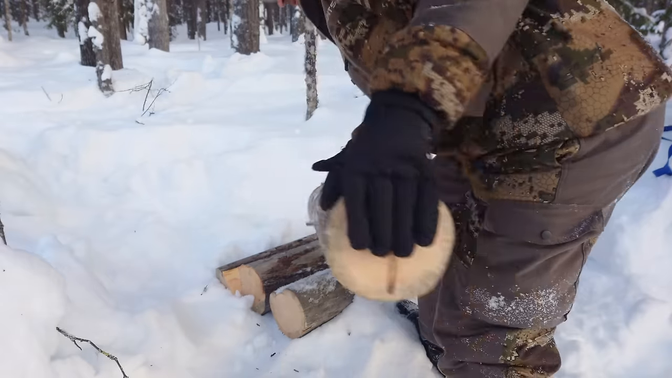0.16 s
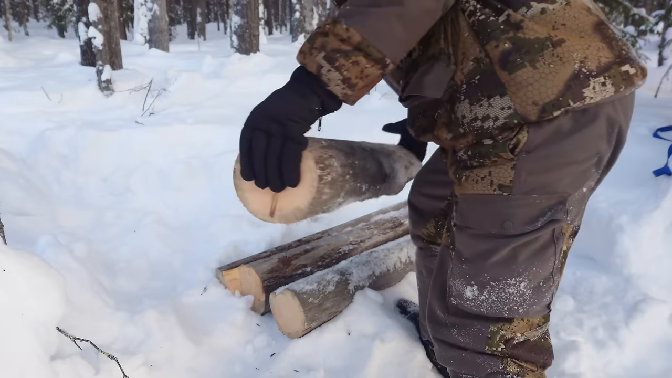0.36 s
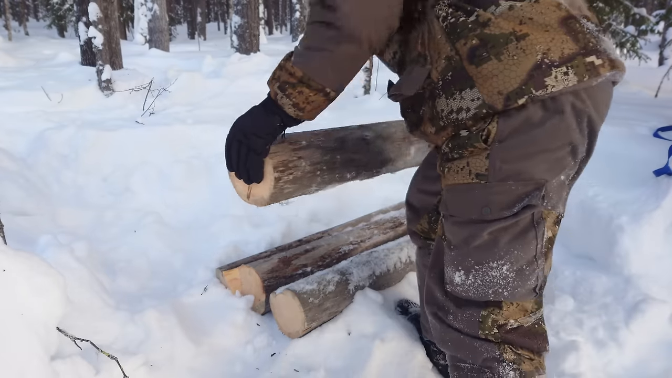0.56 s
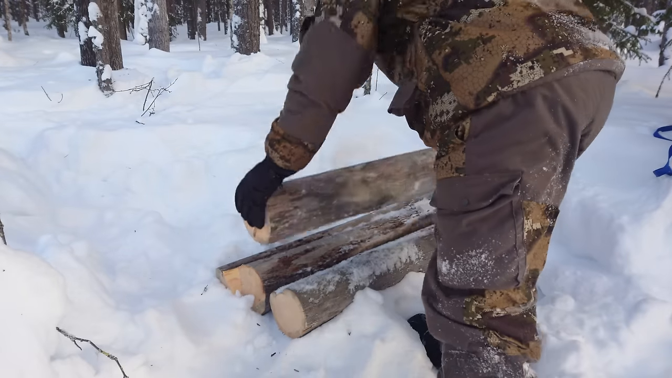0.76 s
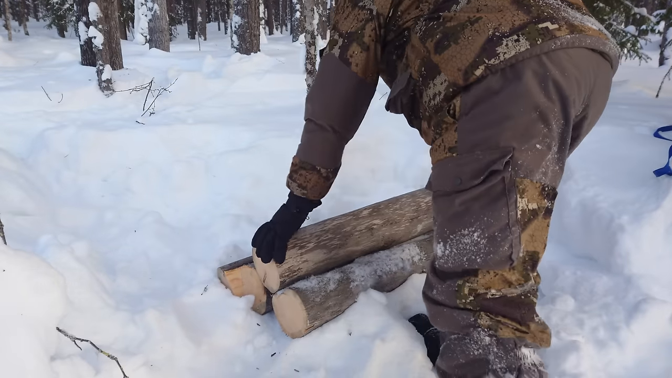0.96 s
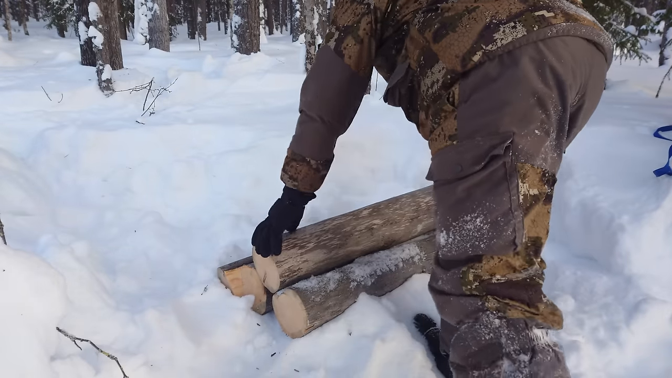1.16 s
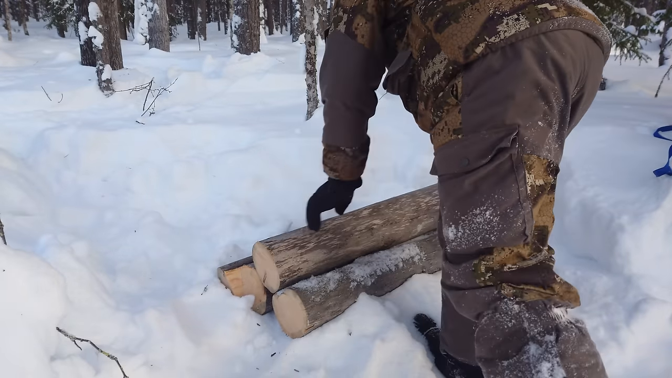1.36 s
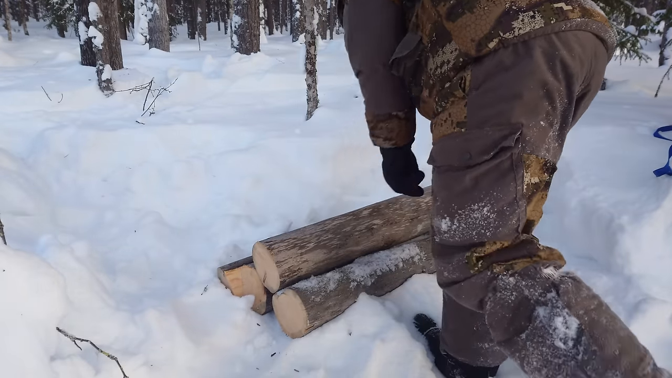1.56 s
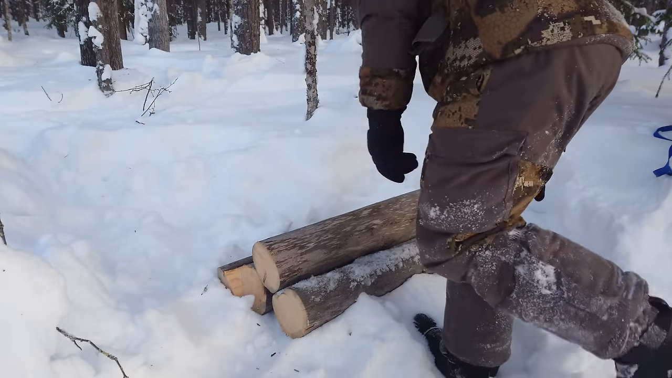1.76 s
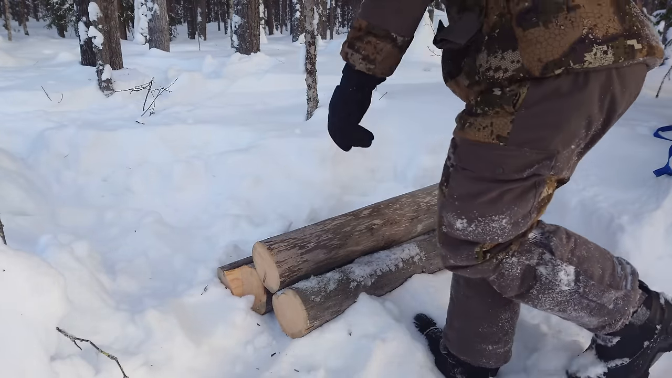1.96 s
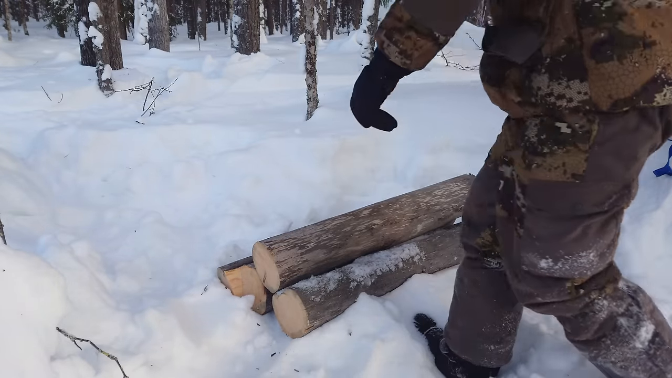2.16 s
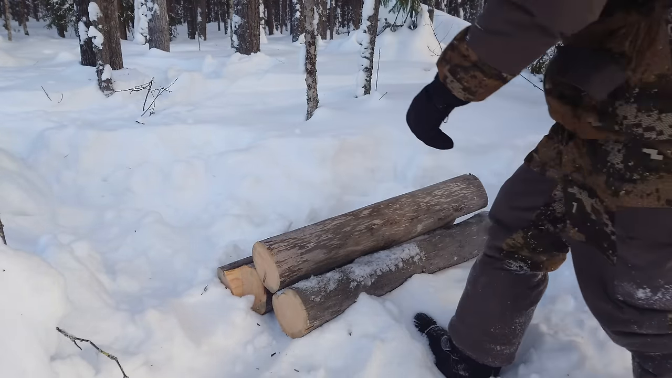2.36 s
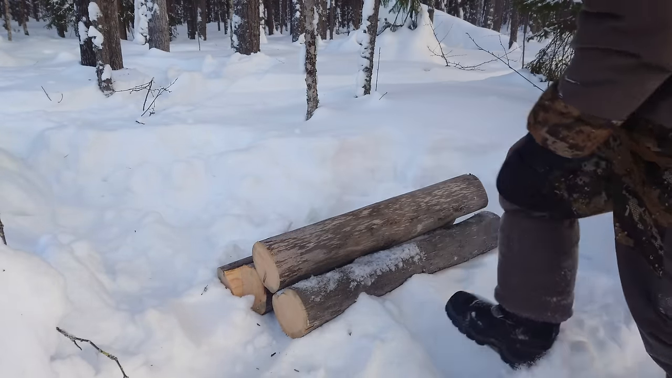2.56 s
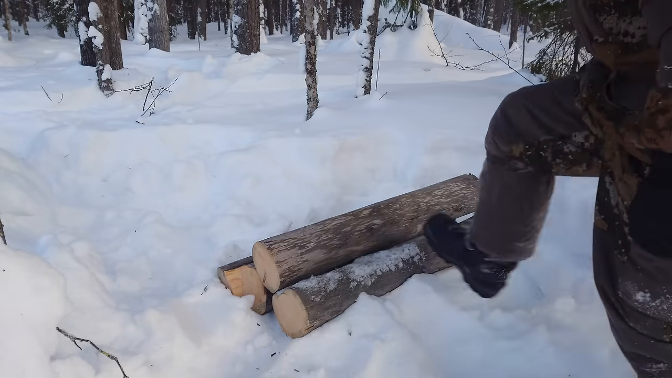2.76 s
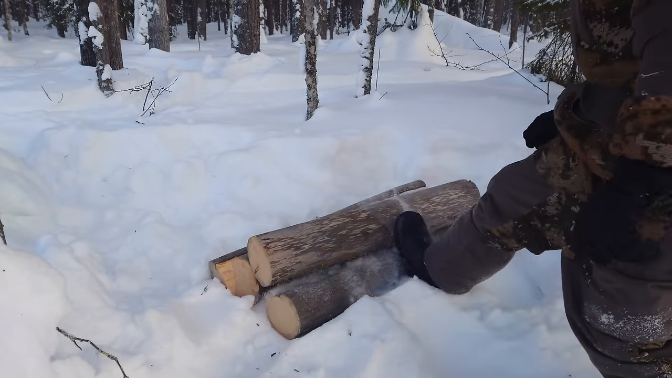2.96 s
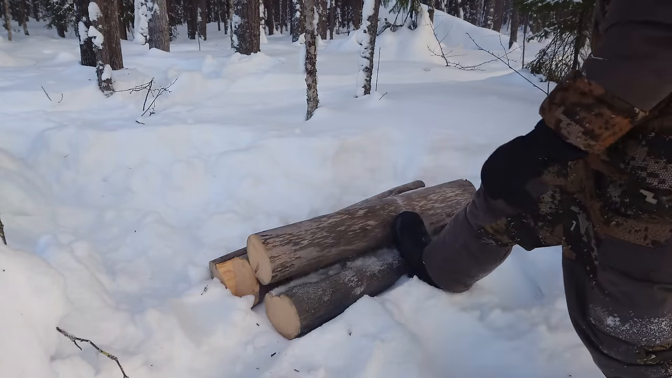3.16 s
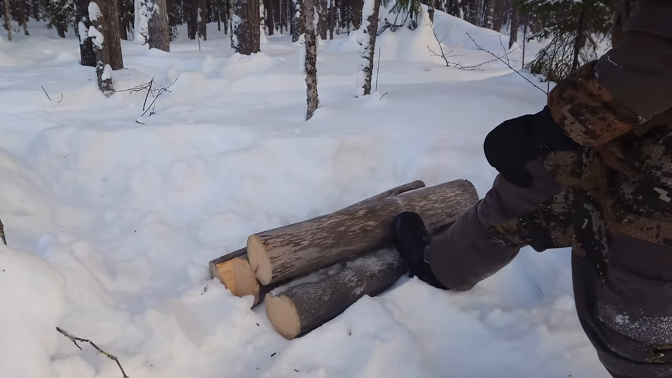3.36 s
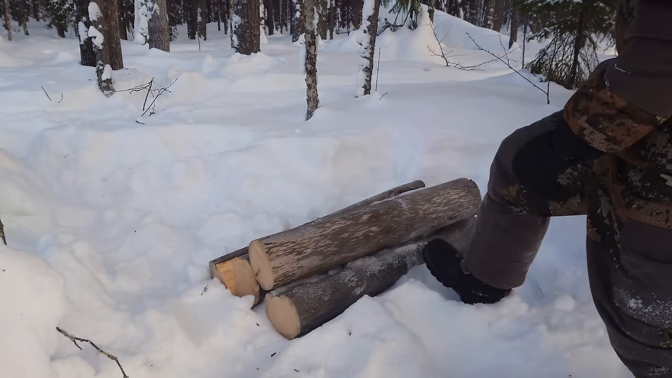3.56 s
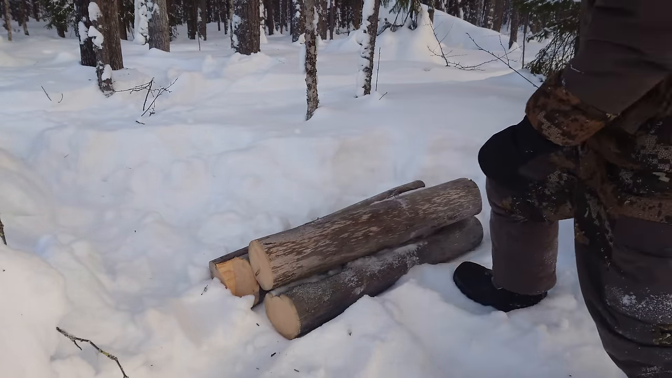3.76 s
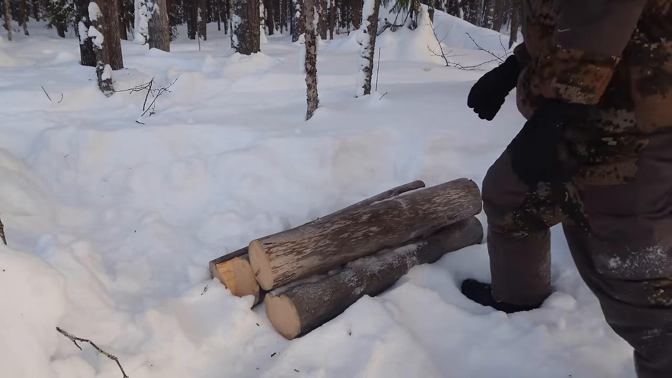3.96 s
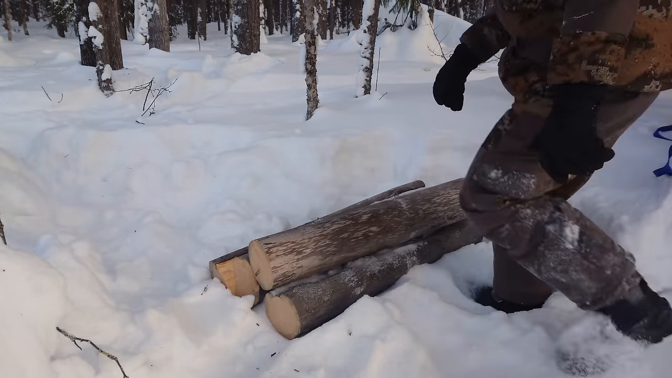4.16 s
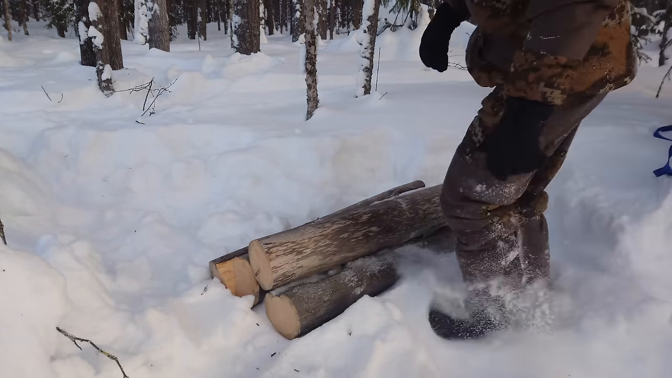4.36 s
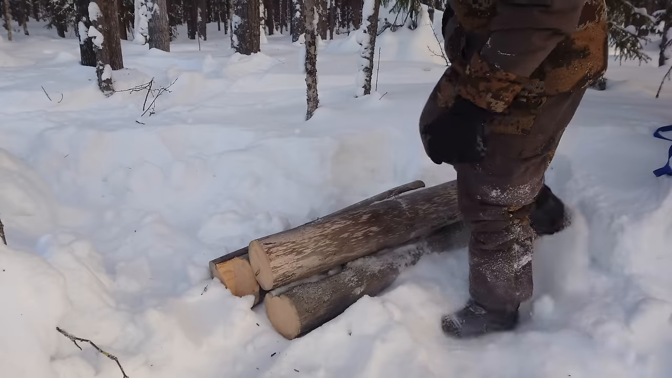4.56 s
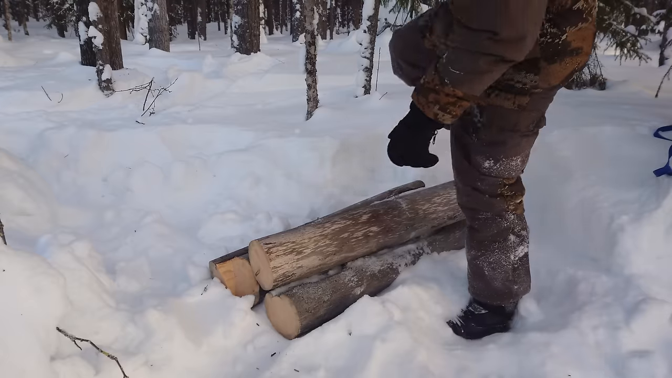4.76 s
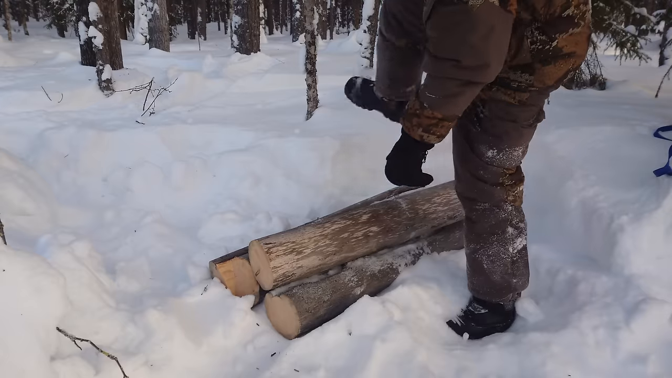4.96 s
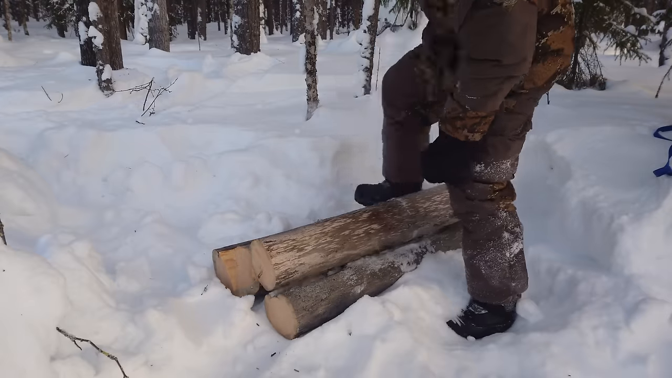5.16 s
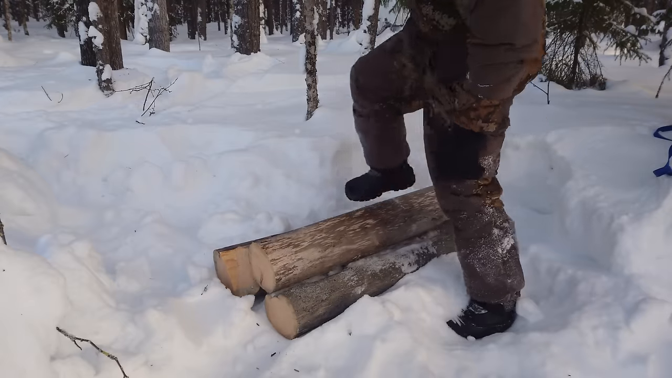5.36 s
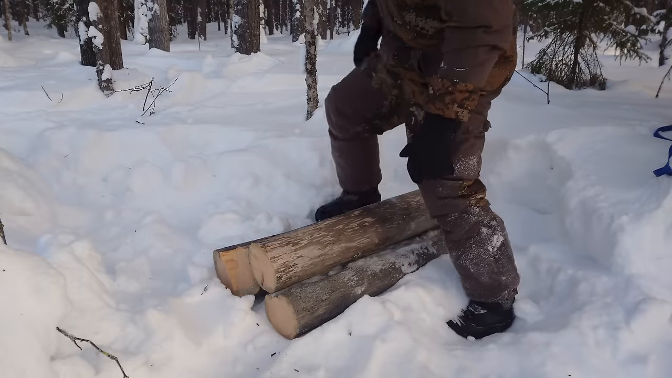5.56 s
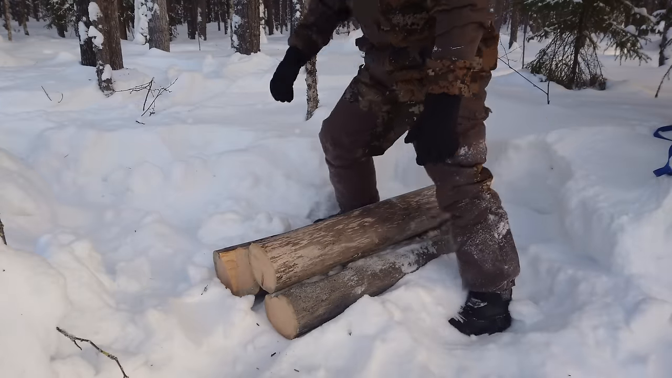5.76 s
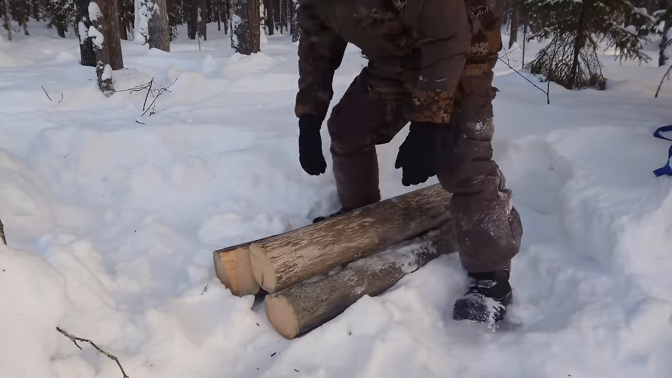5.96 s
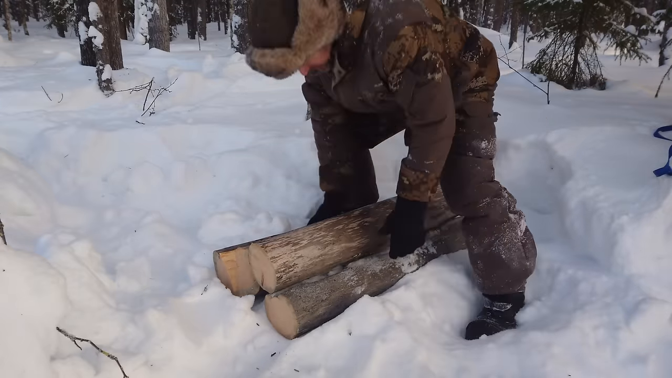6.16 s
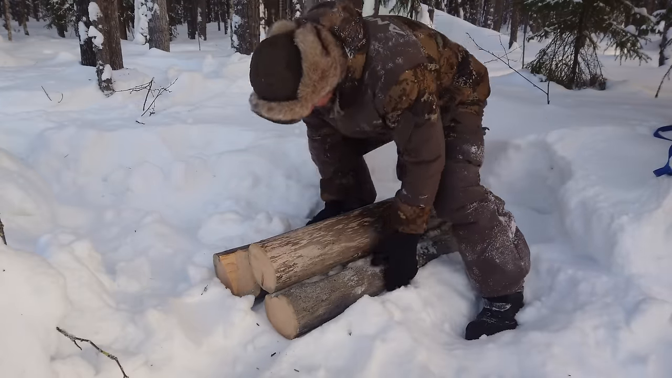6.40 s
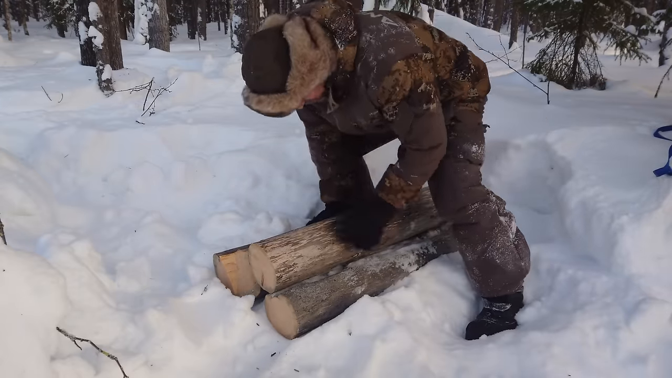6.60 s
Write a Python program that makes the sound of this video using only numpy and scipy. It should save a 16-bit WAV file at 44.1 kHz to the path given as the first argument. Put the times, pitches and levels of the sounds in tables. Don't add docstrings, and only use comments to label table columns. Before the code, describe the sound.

Very close to a small microphone in a quiet snowy wood, snow crumbles and stiff clothes rustle, then a log drops on others with a loud, short woody clonk that overloads. After a lull, boots crunch, a kick thuds the logs with a low jolt, and later a foot lands on them with a snappy crack. Small squeaks, scrapes and snow crunches finish it, nearly echo-free.

```python
import sys
import numpy as np
from scipy import signal
from scipy.io import wavfile
from scipy.ndimage import uniform_filter1d

SR = 44100
rng = np.random.default_rng(int(sys.argv[2]) if len(sys.argv) > 2 else 0)


def decibels_to_gain(level_db):
    exponent = np.asarray(level_db, float) / 20
    return 10 ** exponent


def log_audio(samples):
    frames = np.atleast_2d(samples).T
    limited = np.clip(frames, -1, 1)
    pcm = np.round(limited * 32767).astype(np.int16)
    wavfile.write(sys.argv[1], SR, pcm)


N = 292383

# mode_hz, level_db, t60_s, sign
UPPER_LOG_MODES = [(202, -4.7, .058, 1), (453, -22.4, .185, -1), (498, .1, .089, 1), (508, -8.7, .093, 1),
                   (528, -4.4, .171, 1), (557, -17.2, .165, -1), (732, 3.5, .015, 1),
                   (1012, -16.7, .051, -1), (1169, -16.5, .14, 1)]


def band(x, lo_hz, hi_hz):
    sos = signal.butter(2, [lo_hz, min(hi_hz, .45 * SR)], "band", fs=SR, output="sos")
    return signal.sosfilt(sos, x)


def unit(x):
    return x / np.sqrt(np.mean(x ** 2))


def add(out, start_s, piece):
    i = int(start_s * SR)
    out[i:i + len(piece)] += piece[:N - i]


def walk(rate_hz):
    k = int(SR / rate_hz)
    held = np.repeat(rng.standard_normal(N // k + 1), k)
    return 2.9 * uniform_filter1d(uniform_filter1d(held, k), k)[:N]


def gestures(rows, still_db, attack_s, release_s):
    t, power = np.arange(N) / SR, decibels_to_gain(still_db) ** 2
    for start_s, length_s, level_db in rows:
        swell_s = attack_s + 0.2 * length_s
        rise = np.clip((t - start_s) / swell_s + .5, 0, 1) ** 2
        fall = np.exp(-np.clip(t - start_s - length_s, 0, 1) / release_s)
        power = power + (decibels_to_gain(level_db) * rise * fall) ** 2
    return 10 * np.log10(power)


def first_layer(rows):
    return [(start_s, length_s, level_db) for start_s, length_s, level_db, _ in rows]


def second_layer(rows):
    return [(start_s, length_s, level_db + over_db) for start_s, length_s, level_db, over_db in rows]


def grains(spread_db):
    size_db = spread_db * rng.exponential(size=N).clip(0, 6)
    return unit(rng.standard_normal(N) * decibels_to_gain(size_db))


def crushed(spectrum, common, spread_db, shared, flicker_db, rate_hz):
    hz, db = np.transpose(spectrum)
    together, out = walk(rate_hz), 0
    for f in hz[0] * 2 ** np.arange(.25, np.log2(hz[-1] / hz[0]), .5):
        flicker = together + 0.52 * walk(rate_hz)
        flicker = flicker - uniform_filter1d(flicker, SR // 8)
        breaks = shared * common + grains(spread_db)
        density_db = np.interp(np.log(f), np.log(hz), db)
        gain_db = density_db + 10 * np.log10(f) + flicker_db * flicker
        out = out + decibels_to_gain(gain_db) * unit(band(breaks, f / 2 ** 0.31, f * 2 ** 0.4))
    return unit(out)


def ring(hz, t60_s, t):
    return np.sin(2 * np.pi * hz * t) * np.exp(-np.log(1000) * t / t60_s)


def body(modes, t):
    hz, db, t60_s, sign = np.transpose(modes)[:, :, None]
    return np.sum(sign * decibels_to_gain(db) * ring(hz, t60_s, t), axis=0)


def bursts(table, front, middle):
    out, t = np.zeros(N), np.arange(SR // 10) / SR
    for start_s, peak_db, hz, length_ms in table:
        chips = rng.standard_normal(len(t))
        burst = unit(band(chips, hz / 1.22, hz * 1.16))
        burst = burst + middle * unit(band(chips, 2900, 7500))
        burst = burst + 0.32 * unit(band(chips, 8000, 14000))
        rise = 1 - np.exp(-t * 1000 / (front * length_ms))
        add(out, start_s, decibels_to_gain(peak_db - 8.5) * burst * rise * np.exp(-t * 1000 / length_ms))
    return out


def tremble(lo_hz, hi_hz):
    swing = band(band(rng.standard_normal(N), lo_hz, hi_hz), lo_hz, hi_hz)
    k = int(SR / lo_hz)
    size = np.sqrt(uniform_filter1d(uniform_filter1d(swing ** 2, k), k).clip(1e-12))
    return swing / size * decibels_to_gain(2.26 * walk(14))


def ground():
    # start_s, length_s, sway_db, buzz_over_sway_db
    shakes = [(0, 0.35, -43, -26), (0.24, 0.096, -31.5, -4), (0.41, 0.15, -30, -36),
              (0.567, 0.28, -33.5, -12), (0.949, 0.047, -40.5, 5), (1.065, 0.43, -43.5, -17),
              (1.65, 0.48, -49, -12.5), (2.087, 0.24, -38, -5), (2.327, 0.11, -28, -23),
              (2.446, 0.23, -35, 0), (2.702, 0.09, -34.5, -21), (2.92, 0.19, -35, -8.5),
              (3.132, 0.28, -40.5, -21), (3.42, 0.083, -34.5, -8), (3.554, 0.058, -31, -6.5),
              (3.78, 0.12, -57, 23.5), (3.95, 0.11, -29, -8), (4.28, 0.11, -32, -9.5),
              (4.415, 0.22, -39, -0.5), (4.71, 0.32, -47.5, -11), (5.205, 0.1, -32.5, -2),
              (5.376, 0.16, -36, -4.5), (5.583, 0.17, -30.5, -8), (5.925, 0.19, -40.5, 5),
              (6.176, 0.1495, -25, -7), (6.35, 0.17, -37.5, -21)]
    # start_s, peak_db, pitch_hz, t60_s, sign
    thumps = [(.8769, 1.1, 127.8, .043, -1), (.8759, -1.4, 28.3, .149, 1), (2.8359, -3, 27.7, .204, 1),
              (2.8352, -5.9, 37.3, .171, -1), (3.465, -23, 36, .12, -1), (3.584, -22, 44, .12, 1),
              (3.605, -25, 31, .35, 1), (6.252, -14, 30, .12, -1), (4.335, -22, 40, .1, -1),
              (5.1228, -4.5, 64.8, .062, -1), (5.139, -8.5, 26, .23, 1), (5.1316, -18.3, 103, .055, 1),
              (1.205, -25, 6.7, 9.0, 1)]
    attack_s, release_s = 0.089, 0.045
    sway_db = gestures(first_layer(shakes), -64.5, attack_s, release_s)
    buzz_db = gestures(second_layer(shakes), -66.5, attack_s, release_s)
    out = decibels_to_gain(sway_db) * tremble(13, 35.4) + decibels_to_gain(buzz_db) * tremble(30, 74.4)
    t = np.arange(SR // 2) / SR
    for start_s, peak_db, hz, t60_s, sign in thumps:
        rise_s = .002 if hz > 20 else .04
        jolt = ring(hz, t60_s, t) * (1 - np.exp(-t / rise_s)) * np.cos(np.pi * t)
        add(out, start_s, sign * decibels_to_gain(peak_db) * jolt)
    return out


def clothes(cloth_db, sheen_db):
    # freq_hz, density_db_per_hz
    cloth_spectrum = [(1290, -43), (2200, -5), (2700, -10.5), (3150, -4), (3780, -1.5), (4850, 5.5),
                      (9000, -14), (11700, -37.5), (19800, -120)]
    # freq_hz, density_db_per_hz
    sheen_spectrum = [(4710, -13), (8000, -1.5), (11100, -2), (12500, -7), (15100, -11), (15700, -13)]
    rub = grains(spread_db=2.0)
    cloth = crushed(cloth_spectrum, rub, spread_db=2.2, shared=.9, flicker_db=.9, rate_hz=28)
    sheen = crushed(sheen_spectrum, rub, spread_db=2.2, shared=.9, flicker_db=.8, rate_hz=28)
    return decibels_to_gain(cloth_db) * cloth + decibels_to_gain(sheen_db) * sheen


def snow(deep_db, fine_db):
    # freq_hz, density_db_per_hz
    deep_spectrum = [(47, -34), (80, 2), (201, -0.5), (263, -6), (418, -3), (600, -11.5), (780, -49),
                     (1320, -120)]
    # freq_hz, density_db_per_hz
    fine_spectrum = [(260, -25), (450, -7), (1100, -5), (1550, -6.5), (2360, -27), (3000, -27.5),
                     (3900, -47.5), (6600, -120)]
    breaking = rng.random(N) < 900 / SR
    clods = unit(breaking * decibels_to_gain(2.5 * rng.standard_normal(N)) * rng.choice([-1, 1], N))
    deep = crushed(deep_spectrum, clods, spread_db=3, shared=0.25, flicker_db=0.0, rate_hz=25)
    fine = crushed(fine_spectrum, clods, spread_db=3.5, shared=0.2, flicker_db=1.5, rate_hz=22)
    return decibels_to_gain(deep_db) * deep + decibels_to_gain(fine_db) * fine


def movement():
    # start_s, length_s, weight_db
    steps = [(0, 0.059, -51.5), (.1, 0.49, -55.5), (.26, 0.032, -46), (.56, 0.15, -43), (.68, 0.13, -39.5),
             (.8, 0.089, -45.5), (.9, 0.079, -55), (1.6, 0.6, -62.5), (2.11, 0.24, -41.5),
             (2.34, 0.15, -40.5), (2.48, 0.082, -41), (2.72, 0.23, -53), (2.89, 0.069, -54.5),
             (3.39, 0.075, -53), (3.83, 0.21, -44), (4.08, 0.31, -56.5), (4.32, 0.13, -37.5),
             (4.46, 0.098, -41.5), (4.7, 0.55, -58), (5.15, 0.14, -56), (5.27, 0.38, -65),
             (5.62, 0.17, -49), (5.95, 0.11, -46), (6.08, 0.13, -43), (6.22, 0.12, -44.5),
             (6.38, 0.38, -61.5)]
    # start_s, length_s, effort_db, sheen_over_effort_db
    swings = [(-.1, 0.36, -47, -20.5), (0.233, 0.48, -48, -20), (0.546, 0.24, -45, -23.5),
              (0.794, 0.062, -39, -17.5), (0.919, 0.036, -56.5, -0.5), (1.189, 0.082, -52, -4),
              (1.417, 0.14, -51.5, -13.5), (1.322, 0.084, -55.5, -4.5), (1.553, 0.15, -51, -22.5),
              (1.661, 0.092, -46.5, -19.5), (1.761, .07, -52, -19), (1.842, 0.093, -53.5, -17),
              (1.97, 0.11, -44, -8), (2.077, 0.18, -41.5, -13), (2.269, 0.6, -45, -9),
              (2.564, 0.2, -46, -19.5), (2.837, 0.19, -48.5, -24.5), (3.351, 0.09, -47.5, -26.5),
              (3.471, 0.31, -53, -6), (3.789, 0.38, -44.5, -13), (4.024, 0.093, -46, -9),
              (4.136, 0.21, -41.5, -4.5), (4.266, 0.26, -38, -11.5), (4.608, 0.31, -46.5, -8.5),
              (4.987, 0.11, -51, -11), (5.088, 0.18, -48.5, -10), (5.312, 0.15, -48.5, -11.5),
              (5.607, 0.083, -45.5, -20), (5.757, 0.25, -50, -8), (6.006, .16, -42, -6.5),
              (6.155, 0.17, -42.5, -11.5), (6.366, 0.073, -44.5, -14.5), (6.43, 0.053, -48.5, -18),
              (6.501, 0.037, -48.5, -11), (6.583, 0.055, -48.5, -14.5)]
    swing_attack_s, swing_release_s = 0.05, 0.053
    deep_db = gestures(steps, -65, attack_s=0.019, release_s=0.019)
    cloth_db = gestures(first_layer(swings), -57, swing_attack_s, swing_release_s)
    sheen_db = gestures(second_layer(swings), -66, swing_attack_s, swing_release_s)
    fine_power = decibels_to_gain(deep_db - 5.5) ** 2 + decibels_to_gain(cloth_db - 7.5) ** 2 + decibels_to_gain(-77) ** 2
    return snow(deep_db, 10 * np.log10(fine_power)) + clothes(cloth_db, sheen_db)


def lump_runs():
    # start_s, count, peak_db, pitch_hz
    run_table = [
        (.59, 11, -30.5, 450),
    ]
    gap_s, scatter_db, scatter_oct = .0135, 1.5, .35
    rows = []
    for start_s, count, peak_db, hz in run_table:
        late, size, tone = rng.standard_normal((count, 3)).T
        starts_s = start_s + gap_s * (np.arange(count) + 0.28 * late)
        rows += zip(starts_s, peak_db + scatter_db * size, hz * 2 ** (scatter_oct * tone))
    return rows


def lumps():
    # start_s, peak_db, pitch_hz
    single_lumps = [(.027, -32.5, 606), (.066, -38.5, 412), (.101, -30.5, 383), (.158, -31, 325),
                    (.271, -26.5, 326), (.541, -26.5, 417), (.574, -22, 271), (.575, -28, 1100),
                    (.701, -25.5, 424), (.744, -25.5, 198), (.797, -28, 581), (5.1215, -16, 353),
                    (2.383, -24.5, 426.4), (2.411, -24.5, 313), (2.543, -28.5, 217), (2.696, -26, 336),
                    (3.193, -35, 288), (3.7575, -28.5, 330), (3.758, -42, 805), (3.823, -32, 321),
                    (4.021, -26, 214), (4.572, -26.5, 194), (4.98, -28.5, 230), (5.005, -32, 220),
                    (5.716, -33, 274), (5.739, -28.5, 340), (5.579, -37, 600), (5.59, -35, 500),
                    (5.617, -37, 800), (5.945, -35.5, 270), (5.1205, -21, 1380), (6.101, -25.5, 400),
                    (6.115, -31.5, 620), (6.14, -29, 293), (6.281, -26, 248), (6.304, -25.5, 750),
                    (6.317, -29, 1000), (4.56, -31, 300), (.634, -29, 463), (.676, -37, 385),
                    (3.768, -33, 111), (4.948, -36.5, 397), (2.8295, -15.5, 980), (2.839, -16, 422),
                    (.752, -23.5, 187.7), (3.575, -37.5, 226), (5.961, -28, 270), (5.986, -23, 197),
                    (6.058, -25, 208), (6.089, -28, 330), (6.612, -29.5, 245), (3.035, -37, 194),
                    (.96, -32, 189), (.987, -39, 201), (5.115, -25, 298.6), (5.166, -28, 410),
                    (5.604, -31, 790), (2.895, -25, 122)]
    lag_s = .004
    out, t = np.zeros(N), np.arange(SR // 20) / SR
    for start_s, peak_db, hz in single_lumps + lump_runs():
        crumbs = rng.standard_normal(len(t))
        rough = unit(band(crumbs, hz / 1.5, hz * 2.45)) * np.exp(-t / 0.0054)
        pop = ring(hz, 4.96 / hz, t)
        add(out, start_s + lag_s, decibels_to_gain(peak_db) * (1.51 * pop + 0.29 * rough))
    return out


def bright_snaps():
    # start_s, peak_db, centre_hz, length_ms
    snap_table = [(0.8529, -20, 4010, 1.275), (.8805, -8, 3030, 1), (6.2055, -23, 1300, 2),
                  (2.8336, -17, 3900, 1.2), (3.046, -35, 3880, 1.4), (3.5782, -14.5, 2500, 1.5),
                  (2.939, -28.5, 3810, 1.2), (2.9594, -33, 5140, 1.2), (2.9832, -30, 4763, 1.48),
                  (3.2794, -31, 3740, 1.18), (3.3405, -30.5, 5510, 0.88), (3.7279, -42, 5540, 2.07),
                  (5.1327, -13.5, 4930, 0.59), (5.1521, -9.5, 4400, 0.5), (5.165, -26, 3790, 2.1),
                  (5.6476, -25, 4120, 3), (5.7024, -34, 4000, 2.4), (6.3155, -16, 7900, 1.4)]
    return bursts(snap_table, front=.15, middle=1.2)


def powder_sprays():
    # start_s, peak_db, centre_hz, length_ms
    spray_table = [(2.8385, -15.5, 7900, 4), (3.5768, -15, 3450, 2.07), (5.1235, -9.5, 1380, 2.5),
                   (5.135, -23.5, 1420, 7.6), (5.243, -26, 3240, 4), (3.568, -26, 7500, 4.5),
                   (3.576, -27, 11000, 4), (3.5922, -19, 8500, 1.3), (5.893, -34, 9950, 12),
                   (6.225, -35, 9003, 8), (6.465, -30, 6500, 5), (6.535, -35, 9500, 10),
                   (6.618, -37, 5000, 3)]
    return bursts(spray_table, front=0.41, middle=0.57)


def bark_scrapes():
    # start_s, peak_db, centre_hz, length_ms
    scrape_table = [(0.7657, -28, 4230, 7.8), (1.9836, -42.5, 5230, 13), (2.6965, -32, 5070, 7),
                    (2.8365, -20, 4440, 5.1), (3.4103, -38.5, 5230, 21), (3.579, -28.5, 5430, 4.5),
                    (5.358, -34, 4200, 5.3), (5.401, -33.5, 3960, 7.1), (4.265, -28.5, 4530, 5.2),
                    (5.7798, -40.5, 4750, 4.3), (5.897, -39.5, 4800, 11), (6.205, -29, 5470, 6),
                    (6.2249, -25.5, 4100, 4.2), (6.274, -29, 2380, 9), (6.309, -21, 6200, 7.4),
                    (6.3244, -23.5, 5310, 6.6), (6.534, -35.5, 6240, 8.2)]
    return bursts(scrape_table, front=0.29, middle=2.04)


def squeaks():
    # start_s, length_ms, start_hz, end_hz, level_db
    squeak_table = [
        (5.466, 13, 2600, 2360, -32),
        (5.504, 11, 2480, 2400, -37),
        (5.520, 15, 2200, 2420, -38),
        (5.658, 15, 2350, 2450, -33),
        (.815, 52, 850, 2080, -37),
    ]
    out = np.zeros(N)
    for start_s, length_ms, start_hz, end_hz, level_db in squeak_table:
        over_db = 5 - 0.47 * length_ms
        n = int(length_ms * SR / 1000)
        wobble, grit, spray = rng.standard_normal((3, n))
        hz = np.linspace(start_hz, end_hz, n) * (1 + .2 * uniform_filter1d(wobble, size=40))
        phase = 2 * np.pi * np.cumsum(hz) / SR
        upper = np.sin(2 * phase) + .35 * np.sin(3 * phase) + .5 * np.sin(1.63 * phase)
        upper = upper + 1.1 * band(spray, 900, 8000)
        rough = 1 + 2 * uniform_filter1d(grit, size=24)
        swell = np.sin(np.pi * np.arange(n) / n)
        add(out, start_s, decibels_to_gain(level_db) * (np.sin(phase) + decibels_to_gain(over_db) * upper) * rough * swell)
    return out


def rocking():
    # start_s, length_s, level_db
    rocking_table = [
        (2.87, .2, -53.5),
        (3.398, .06, -47.5),
        (5.156, .39, -75),
        (5.641, 0.053, -49),
    ]
    nudges = np.zeros(N)
    for start_s, length_s, level_db in rocking_table:
        n = int(length_s * SR)
        hit = rng.random(n) < 160 / SR
        add(nudges, start_s, 0.43 * decibels_to_gain(level_db) * rng.standard_normal(n) * hit)
    response = np.diff(body(UPPER_LOG_MODES, np.arange(SR // 4) / SR))
    return 16 * signal.fftconvolve(nudges, response)[:N]


def jogs():
    # start_s, first_mode_db, second_mode_db
    jog_table = [(.94, -62, -62), (.962, -60, -52), (0.991, -63, -50), (1.08, -54, -70), (1.16, -54, -76),
                 (2.846, -31, -26.5), (2.858, -35, -50), (2.905, -32, -54), (2.945, -48, -58),
                 (2.972, -46, -62), (3.03, -56, -52), (3.412, -47, -50), (3.438, -42, -61),
                 (3.58, -50, -39.5), (3.598, -48, -53), (3.63, -49, -66), (5.144, -53, -45),
                 (5.169, -49, -47), (5.19, -43, -56), (5.235, -51, -49), (5.25, -37.5, -41),
                 (5.29, -56, -62), (5.34, -44, -64.5), (5.366, -40.5, -50), (5.395, -51, -51),
                 (5.412, -46, -58.5), (5.46, -64.5, -57), (5.475, -54, -50), (5.505, -54, -50),
                 (5.645, -45, -41), (5.668, -52, -55)]
    out, t = np.zeros(N), np.arange(SR // 4) / SR
    first = ring(528, .11, t) + .4 * ring(557, .15, t)
    second = ring(1168, .09, t)
    rise = 1 - np.exp(-t / .002)
    for start_s, first_db, second_db in jog_table:
        add(out, start_s, (decibels_to_gain(first_db) * first + decibels_to_gain(second_db) * second) * rise)
    return out


def logs():
    # start_s, upper_log_db, lower_logs_db, contact_ms, crack_db
    blows = [(.87652, -7.2, -16.6, 1.04, -31), (.87791, 2, 6.8, .91, -40), (.87972, 1.7, -4.7, .5, -30),
             (.87973, -15.5, -3.1, .82, -36), (.88231, -36, -12.7, .57, -36),
             (2.83263, -15.8, -7.3, 1.98, -40), (2.8346, -60, -10.9, 1.0, -30), (2.982, -48, -42, .3, -44),
             (3.578, -55, -54, .41, -36), (5.12458, -24.6, -22.2, .45, -22),
             (5.12563, -27.3, -21.5, .76, -34), (5.243, -46, -50, .42, -42), (5.288, -48, -48, .3, -50),
             (.286, -47, -41, .3, -55)]
    # mode_hz, level_db, t60_s, sign
    lower_log_modes = [(110, -30, .153, 1), (146, 2.6, .008, 1), (194, -11.6, .049, 1),
                       (282, -10.9, .056, 1), (504, 5.2, .047, 1), (628, -.7, .012, 1),
                       (761, -1.4, .009, 1), (1120, -7.6, .037, 1), (1381, -20.8, .013, 1),
                       (1545, -27, .03, 1), (1728, -26, .035, 1), (2200, -29, .025, 1), (2700, -29, .02, 1)]
    out, t = np.zeros(N), np.arange(SR // 3) / SR
    upper, lower = body(UPPER_LOG_MODES, t), body(lower_log_modes, t)
    thud_decay = np.exp(-t / 0.0099) + 0.041 * np.exp(-t / 0.014)
    crack_decay = np.exp(-t / 0.00042) + 0.42 * np.exp(-t / 0.02)
    for start_s, upper_db, lower_db, contact_ms, crack_db in blows:
        fibre, bed, bark = rng.standard_normal((3, len(t)))
        thud_db = max(upper_db, lower_db) + (-2 if contact_ms < .4 else -27)
        push = np.hanning(int(contact_ms * SR / 1000) + 3)
        ringing = decibels_to_gain(upper_db) * upper - decibels_to_gain(lower_db) * lower
        add(out, start_s, np.convolve(ringing, push / push.sum()))
        add(out, start_s, decibels_to_gain(thud_db) * unit(band(fibre, 270, 1400)) * thud_decay)
        add(out, start_s, decibels_to_gain(thud_db + 3) * unit(band(bed, 82, 490)) * np.exp(-t / 0.0092))
        crack = unit(band(bark, 1800, 6500) + 0.12 * band(bark, 6000, 15000))
        add(out, start_s, decibels_to_gain(crack_db) * crack * crack_decay)
    return out


def scene():
    near = lumps() + bright_snaps() + powder_sprays() + bark_scrapes() + squeaks()
    near = near + rocking() + jogs() + logs()
    t = np.arange(SR // 3) / SR
    echo = band(rng.standard_normal(len(t)), 110, 2300) * np.exp(-np.log(1000) * t / 0.073)
    wet = decibels_to_gain(-36.5) * signal.fftconvolve(near, echo)[:N]
    return (ground() + movement() + near + wet)[None]


def top_cut(x):
    return signal.sosfilt(signal.butter(12, 15850, fs=SR, output="sos"), x)


def record(dry):
    held = dry / (1 + np.abs(dry) ** 8) ** (1 / 8)
    low_pass = signal.ellip(8, .2, 70, 15830, fs=SR, output="sos")
    mix = signal.sosfilt(low_pass, held)
    return top_cut(mix)


dry = scene()
out = record(dry)
log_audio(out)
```